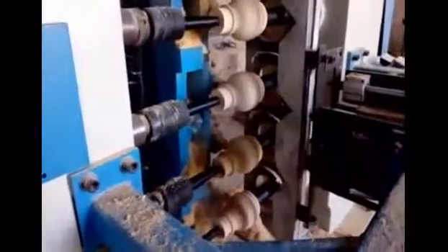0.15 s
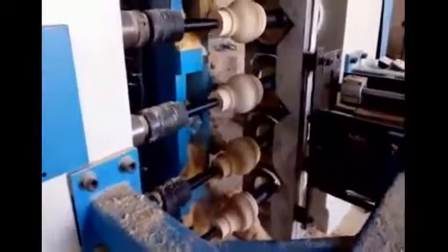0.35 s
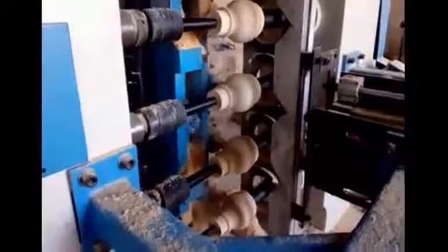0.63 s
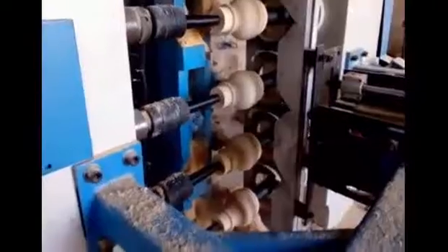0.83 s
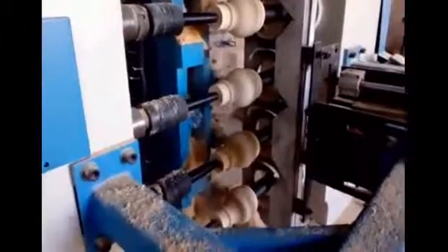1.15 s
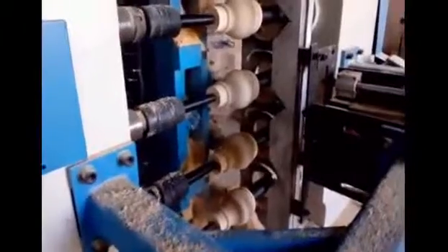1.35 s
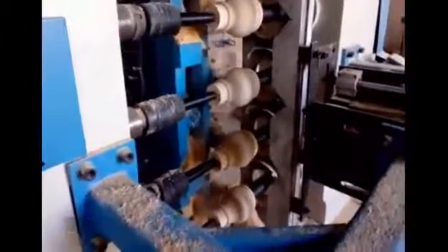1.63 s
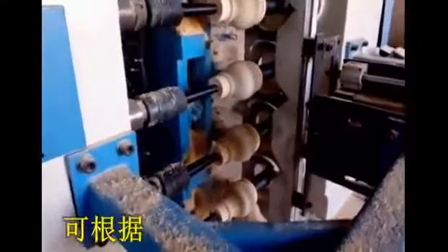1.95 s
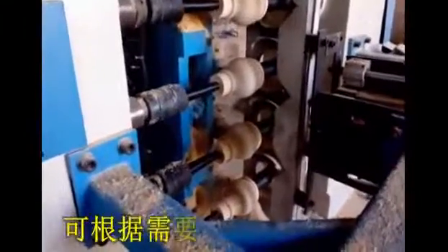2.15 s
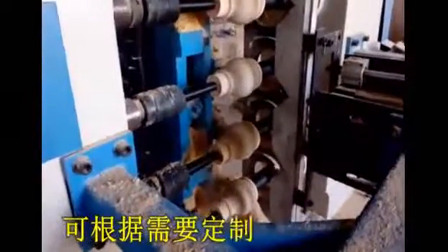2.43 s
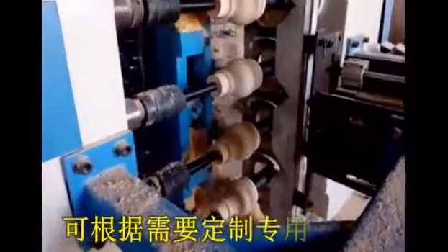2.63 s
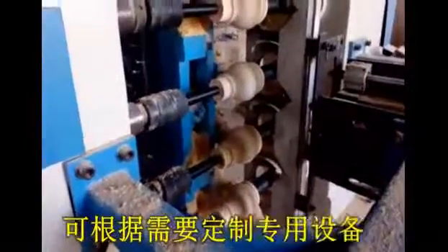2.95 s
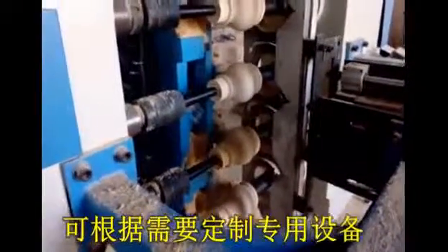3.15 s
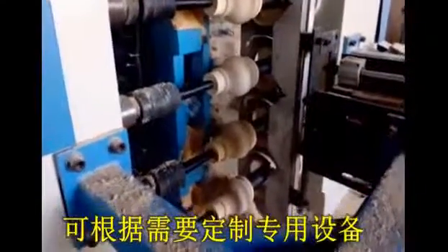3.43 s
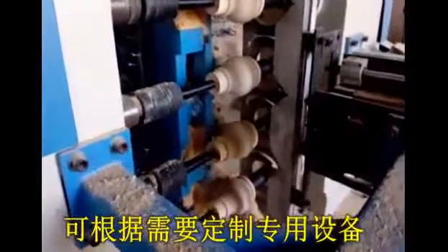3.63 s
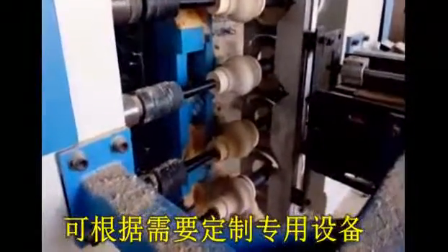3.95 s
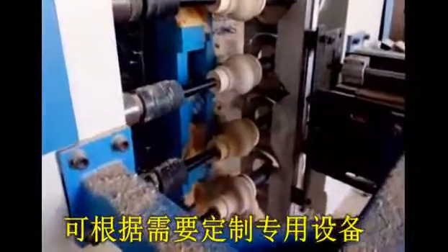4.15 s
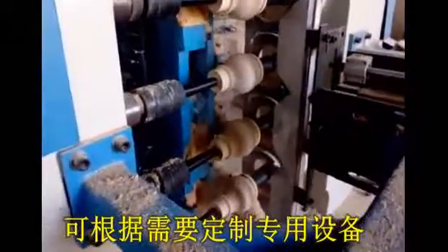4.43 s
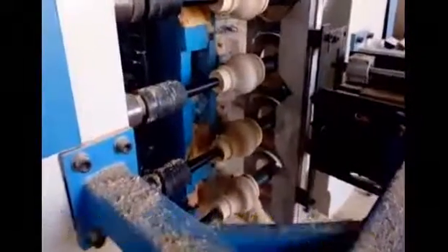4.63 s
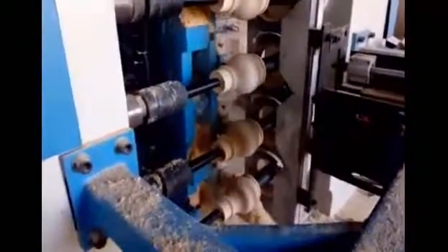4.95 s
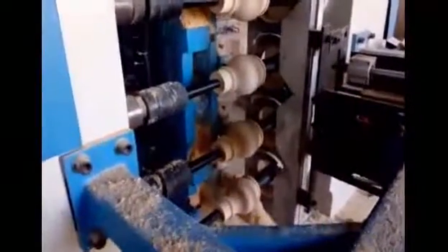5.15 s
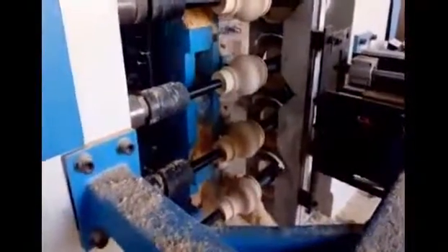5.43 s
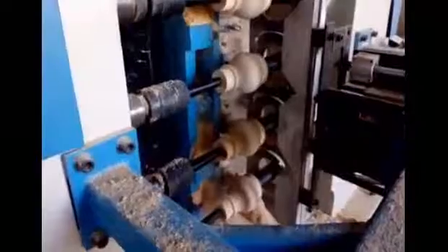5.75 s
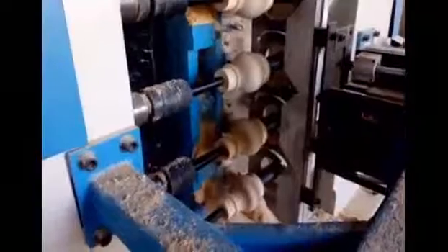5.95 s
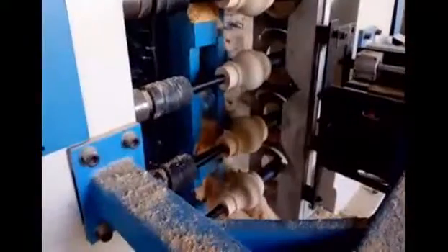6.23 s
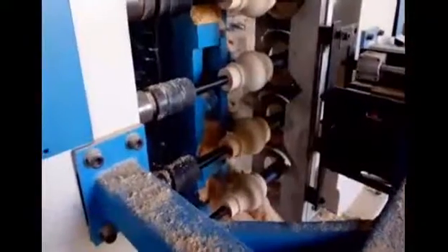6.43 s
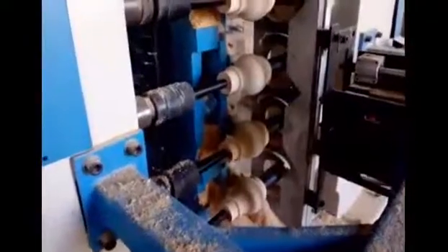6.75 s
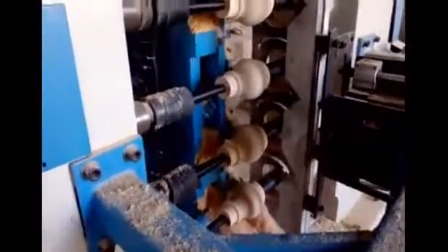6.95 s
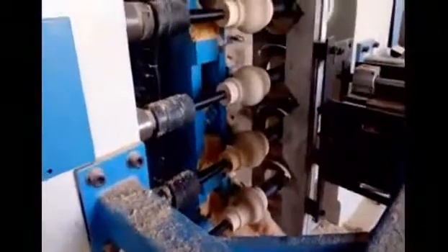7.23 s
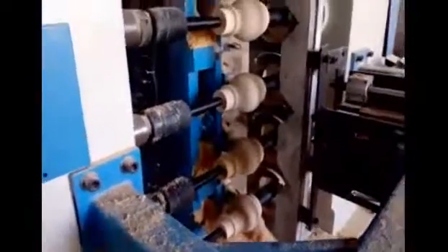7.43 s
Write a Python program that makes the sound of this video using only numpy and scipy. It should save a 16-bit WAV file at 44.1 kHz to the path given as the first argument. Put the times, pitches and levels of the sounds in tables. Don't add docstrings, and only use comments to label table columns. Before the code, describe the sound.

Close up in a workshop, a multi-spindle wood lathe runs continuously: low motor rumble, a piercing gear whine fluttering rapidly, and harsh rushing noise of blades shaving wood. Halfway through, the tool slide groans briefly and the cut changes colour. Dust hiss swells, pushing the rest down, then fades. Finally the blades lift and the freed spindles whine and rumble louder.

```python
import sys
import numpy as np
from scipy import signal
from scipy.fft import rfft, irfft, next_fast_len
from scipy.io import wavfile
from scipy.ndimage import uniform_filter1d, map_coordinates

SR = 44100
rng = np.random.default_rng(int(sys.argv[2]) if len(sys.argv) > 2 else 0)


def rack_gain(trim_db):
    fader = np.asarray(trim_db, float)
    return 10 ** (fader / 20)


def store_pcm(level_fs):
    pcm = np.round(np.clip(level_fs, -1, 1) * 32767).astype(np.int16)
    wavfile.write(sys.argv[1], SR, np.atleast_2d(pcm).T)


N = 335160


def unit(x):
    return x / np.sqrt(np.mean(x ** 2) + 1e-20)


def along(points, hz):
    f, v = np.transpose(points)
    return np.interp(np.log(hz + 1), np.log(f + 1), v)


def curves(rows):
    s, *cols = np.transpose(rows)
    return [np.interp(np.arange(N) / SR, s, c) for c in cols]


def wobble(rate):
    knots = rng.standard_normal(int(N * rate / SR) + 4)
    return map_coordinates(knots, [np.arange(N) * rate / SR])


def filtered(x, response):
    m = next_fast_len(N + 8192)
    return irfft(rfft(x, m) * response(np.fft.rfftfreq(m, 1 / SR)), m)[..., :N]


def bumps_db(modes, hz):
    return sum(db / (1 + (2 * (hz - centre) / width) ** 2) for centre, width, db in modes)


def narrow(centre_hz, width_hz):
    phase = 2 * np.pi * centre_hz * np.arange(N) / SR
    return unit(wobble(width_hz) * np.cos(phase) + wobble(width_hz) * np.sin(phase))


def field(shape, bins, frames):
    x = uniform_filter1d(rng.standard_normal(shape), max(1, round(bins)), -2)
    return unit(uniform_filter1d(x, max(1, round(frames)), -1))


# frequency in Hz, left-right likeness from 0 to 1.
LIKENESS = [(60, .7), (400, .6), (2000, .6), (7000, .7), (9000, .3)]


def rush(colour_db, streak_db):
    re, im = rng.standard_normal((2, 2, 1025, N // 1024 + 3))
    streaks = rack_gain(streak_db * field(re.shape[1:], 3, 4))
    pair = signal.istft((re + 1j * im) * streaks, window="cosine", nperseg=2048)[1][:, :N]

    def mid_side_response(hz):
        turn = np.arccos(np.clip(along(LIKENESS, hz), 0, 1)) / 2
        return rack_gain(colour_db(hz)) * [np.cos(turn), np.sin(turn)]

    mid, side = filtered(pair, mid_side_response)
    return unit(np.array([mid + side, mid - side]))


FREED_S = (7.1, 7.35)


def shudder_db():
    return np.interp(np.arange(N) / SR, FREED_S, (0, 2.5))


# time in seconds, depth of cut in dB, dust flow in dB.
CUT = [(0, 0, 0.5), (1.9, 1.5, -2), (3.2, 1.5, -0.5), (3.6, 0, 4), (3.85, 0.5, 3), (4.0, -2.5, 4),
       (4.8, -0.5, 8), (5.7, 2, 9), (6.3, 2, 4.5), (6.8, -2, 2), (7.06, -5, -4)]
# time in seconds, level in dB.
LIFT = [
    (7.06, -5),
    (7.1, -14),
    (7.13, -28),
    (7.2, -28),
]


def load_db():
    unloaded_db = -8.5
    return np.maximum(curves(CUT)[0] + curves(LIFT)[0], unloaded_db)


# frequency in Hz, density in dB per Hz.
RUMBLE = [(8.8, -43), (15, -2), (38, -22), (64, -9.5), (97, -6), (155, 1), (209, -4.5), (252, -2),
          (350, -11), (460, -40), (770, -120)]
# centre in Hz, width in Hz, dB above the rumble.
FRAME_MODES = [(69, 9.8, 3), (158, 32, 0), (245, 23, 5)]
# frequency in Hz, density in dB per Hz.
BED = [(250, -67), (350, 1), (500, -3.5), (646, -3.5), (740, -6.5), (800, -31), (1000, -55)]
# frequency in Hz, density in dB per Hz.
CASING = [(460, -31), (780, -8.5), (984, -4), (1150, -6.5), (1460, -3.5), (1600, -3), (1700, 1),
          (1860, -2.5), (2000, -19), (2600, -37), (4400, -120)]


def frame():
    rumble_db, bed_db, casing_db = -25.5, -35.5, -32
    bed_follows, casing_follows = 0.18, 0.8
    rumble = rush(lambda hz: along(RUMBLE, hz) + bumps_db(FRAME_MODES, hz), streak_db=-0.7)
    rumble = rumble + rack_gain(-17) * narrow(74, width_hz=7.6)
    lumps = rack_gain(1.2 * wobble(45))
    bed = rush(lambda hz: along(BED, hz), streak_db=-1.0)
    casing = rush(lambda hz: along(CASING, hz), streak_db=0.5)
    shaken = rack_gain(rumble_db + shudder_db()) * lumps * rumble
    bed = rack_gain(bed_db + bed_follows * load_db() + 0.77 * wobble(9.7)) * bed
    return shaken + bed + rack_gain(casing_db + casing_follows * load_db() + 0.42 * wobble(7.4)) * casing


# time in seconds, level in dB.
SLIDE = [
    (3.8, -80),
    (3.9, -44),
    (3.97, -35),
    (4.07, -32),
    (4.15, -34),
    (4.22, -50),
    (4.3, -80),
]
# time in seconds, level in dB.
FEED = [
    (0, -38),
    (.35, -39),
    (.8, -39),
    (1.0, -65),
    (1.1, -77),
]


def slide():
    groan = rack_gain(curves(SLIDE)[0]) * rack_gain(1.5) * narrow(642, width_hz=90)
    song = rack_gain(curves(FEED)[0]) * narrow(1450, width_hz=200)
    return groan + song


MESH_HZ = 2633
# order, level in dB.
TEETH = [(7, -17), (8, -17), (9, 0), (10, -22), (11, -18), (12, -20), (13, -20), (14, -19), (15, -21)]
# time in seconds, spindle turns ahead.
LAG = [
    (0, -.3),
    (1.9, -.4),
    (2.5, .3),
    (3.4, 0),
    (4.4, -.15),
    (4.9, -.45),
    (5.6, .15),
    (6.2, .12),
    (6.8, -.35),
    (7.6, -.55),
]
PARTNER_DB = [
    [-3.5],
    [-6],
]
# time in seconds, level in dB.
MESH_LOAD = [(0, -2.5), (.6, -1), (1.2, -1), (1.9, 1), (2.4, 1.5), (3.0, 0), (3.6, -0.5), (4.1, -1),
             (4.7, -2.5), (5.3, -0.5), (5.9, 0.5), (6.4, 1.5), (6.9, 1.5), (7.2, -0.5), (7.6, -0.5)]
# frequency in Hz, density in dB per Hz.
GEARBOX = [(1500, -37), (1950, -9.5), (2100, -4.5), (2350, -1), (2800, -8), (3300, -2.5), (4400, -10),
           (5000, -9.5), (5550, -10), (5850, -23.5), (7200, -22), (9000, -21.5), (11000, -30.5),
           (13000, -60)]
# centre in Hz, width in Hz, change in
# dB.
BOX_SHAPE = [(6400, 140, -3), (7220, 40, 9), (7520, 300, -10), (8500, 300, -7), (8900, 450, -11),
             (10060, 80, -8), (10210, 40, 9)]


def gears():
    whine_db, box_db, spindle_hz = -24, -26.5, 31.17
    mesh_hz = MESH_HZ + 3 * wobble(1) + 8 * wobble(30)
    mesh = 2 * np.pi * np.cumsum(mesh_hz) / (9 * SR)
    turn = 2 * np.pi * (spindle_hz * np.arange(N) / SR + curves(LAG)[0])
    tone = 0
    for order, db in TEETH:
        jitter = 1.46 * wobble(25) * (order != 9)
        tone = tone + rack_gain(db + 1.5 * wobble(20)) * np.sin(order * mesh + jitter)
    lower = rack_gain(PARTNER_DB + 1.5 * wobble(8)) * np.sin(9 * mesh - turn)
    upper = rack_gain(-14 + 2 * wobble(8)) * np.sin(9 * mesh + turn)
    skirt = np.array([narrow(2630, width_hz=90), narrow(2630, width_hz=90)])
    whine = unit(tone + lower + upper) + rack_gain(-4) * skirt
    box = rush(lambda hz: along(GEARBOX, hz) + bumps_db(BOX_SHAPE, hz), streak_db=0.7)
    return rack_gain(whine_db + shudder_db() + curves(MESH_LOAD)[0]) * whine + rack_gain(box_db) * box


# time in seconds, share of the neck cut from 0 to 1.
TRAVEL = [
    (0, 0.11),
    (3.8, 0.08),
    (4.0, 0.82),
    (5.5, 0.99),
    (7.0, 0.36),
    (7.6, .6),
]
# frequency in Hz, density in dB per Hz.
SHAVING = [(1500, -57), (1950, -8), (2100, -8), (2400, -3.5), (2800, -4.5), (3300, -5.5), (4000, 0),
           (5500, -2), (5900, -5), (6400, -8), (7300, -11), (8500, -12)]
# centre in Hz, width in Hz, change in dB.
WIDE_CUT = [(2060, 80, 1.5), (2290, 150, 3), (3230, 80, 2), (3390, 60, 3), (3540, 50, 4), (3690, 80, 6),
            (3880, 80, -4), (4070, 90, 2.5), (4280, 130, -7), (4480, 80, 3), (4600, 90, 6), (4760, 80, -6),
            (4900, 60, 3.5), (5080, 90, 4), (5450, 150, 2), (5980, 45, 5), (6090, 50, 4), (6400, 100, -3),
            (6580, 200, 3), (6950, 100, -5), (7100, 120, 3), (7300, 100, -5)]
# centre in Hz, width in Hz, change in dB.
NECK_CUT = [(2080, 28, 3.5), (2300, 70, -11), (3370, 330, 3.5), (3685, 80, 4.5), (3800, 99, 2.5),
            (4240, 49, -1), (4590, 39, 5), (4680, 28, 5), (5660, 650, 5), (5820, 86, -1), (6700, 130, -11),
            (6400, 150, 3), (7000, 170, -21), (7230, 170, -14), (7730, 780, 6)]
# frequency in Hz, density in dB per Hz.
DUST = [(3530, -13), (6000, -8.5), (7120, -6.5), (8670, -5.5), (10600, 2), (11200, 3.5), (14500, -73),
        (22000, -120)]
# centre in Hz, width in Hz, change in dB.
NOZZLE = [(9636, 50, 4), (10080, 120, -4), (10216, 35, 7), (10690, 60, 2)]


def blades():
    shave_level, hiss_level = -14.5, -22.5
    shave_db, dust_db = np.array(curves(CUT)) + curves(LIFT)
    neck = np.clip(curves(TRAVEL)[0], 0, 1)
    bulge = rush(lambda hz: along(SHAVING, hz) + 1.25 * bumps_db(WIDE_CUT, hz), streak_db=-1.0)
    slim = rush(lambda hz: along(SHAVING, hz) + bumps_db(NECK_CUT, hz), streak_db=-0.5)
    dust = rush(lambda hz: along(DUST, hz) + bumps_db(NOZZLE, hz), streak_db=1.3)
    grain = wobble(14)
    cutting = np.sqrt(1 - neck) * bulge + np.sqrt(neck) * slim
    shaving = rack_gain(shave_level + shave_db + 0.042 * grain) * cutting
    return shaving + rack_gain(hiss_level + dust_db + 0.5 * grain + 0.82 * wobble(40)) * dust


# frequency in Hz, left-right difference in dB.
PORTS = [(60, 1), (600, 0), (1100, -1), (2600, -3), (3600, -0.5), (6500, -1), (7800, 2), (8500, 2.5),
         (11000, 6)]


def scene():
    machine = frame() + slide() + gears() + blades()
    return filtered(machine, lambda hz: rack_gain(along(PORTS, hz) * [[0.5], [-0.5]]))


# frequency in Hz, depth in dB.
FLICKER_DEPTH = [(1200, 0), (1900, 4), (2400, 5), (3500, 6), (6000, 5.5), (7500, 4.5), (8500, 2.5), (11000, 2)]


def flicker(hz, shape):
    ripple = field(shape[1:], 3, 9) + 0.4 * field(shape, 3, 9)
    ripple = unit(ripple - uniform_filter1d(ripple, size=11, axis=1))
    off_whine = abs(hz - MESH_HZ) > 70
    depth_db = along(FLICKER_DEPTH, hz)[:, None] * off_whine[:, None]
    gain = rack_gain(depth_db * unit(np.tanh(ripple)))
    return gain / np.sqrt(uniform_filter1d(gain ** 2, size=25, axis=1))


# frequency in Hz, threshold in dB relative to the reference level.
GATE_THRESHOLD = [(300, -22), (600, -13), (780, -7), (850, -5), (1000, -6), (1250, -7), (1700, -6.5), (1950, -6),
                  (2300, -7), (6000, -6.5), (6400, -3), (7600, -2), (8000, -6), (11000, -9)]
# time in seconds, extra threshold in dB.
SHORT = [(4.74, 3), (4.92, 1), (5.0, 2.5), (5.14, 2), (5.26, 3.5), (5.4, 4), (5.55, 1.5), (5.65, 4),
         (5.73, 2.5), (5.81, 7), (6.11, 7)]


def gated(hz, t, z):
    power = np.abs(z) ** 2 + 1e-14
    level = 10 * np.log10(power)
    smooth = uniform_filter1d(uniform_filter1d(power, size=3, axis=1), size=4, axis=2)
    patch = 10 * np.log10(np.abs(smooth))
    busy = uniform_filter1d(level[:, hz > 7500].mean(axis=(0, 1)), size=9)
    near = uniform_filter1d(uniform_filter1d(level, size=90, axis=1), size=9, axis=2)
    reference = np.where(hz[:, None] < 2200, busy, near)
    reference = reference + 2.8 * field(z.shape[1:], 9, 4) + 0.7 * field((1, z.shape[2]), 1, 3)
    extra_db = sum(db * (abs(t - s) < 0.03) for s, db in SHORT)
    reference = reference + (hz[:, None] < 1400) * extra_db
    floor_db = np.where(hz > 6000, -71, -99)
    limit = np.maximum(reference + along(GATE_THRESHOLD, hz)[:, None], floor_db[:, None])
    return z / (1 + rack_gain(12 * np.clip(limit - patch, -9, 2.5)))


# time in seconds, turns by which left leads.
APART = [(0.0, 0.33), (0.24, -0.37), (0.45, -2.07), (0.82, 0.14), (0.88, -0.51), (0.97, -0.08),
         (1.1, -1.46), (1.27, -1.65), (1.33, -1.1), (1.45, -2.67), (1.63, -3.74), (1.89, -3.38),
         (2.04, -2.54), (2.34, -4.79), (2.56, -5.69), (2.67, -5.55), (2.72, -6.37), (2.85, -5.54),
         (3.17, -5.85), (3.23, -5.26), (3.45, -5.25), (3.46, -4.82), (3.64, -5.04), (3.79, -3.92),
         (3.86, -4.95), (3.98, -4.4), (4.08, -4.73), (4.25, -2.77), (4.35, -3.21), (4.43, -2.39),
         (4.57, -3.07), (4.69, -4.77), (4.8, -5.21), (4.87, -5.09), (4.92, -4.34), (4.98, -4.73),
         (5.16, -2.83), (5.24, -3.5), (5.42, -2.73), (5.48, -3.09), (5.54, -2.43), (5.76, -3.4),
         (5.87, -3.13), (5.96, -4.11), (6.09, -4.42), (6.15, -3.6), (6.35, -4.6), (6.45, -4.51),
         (6.6, -3.4), (6.68, -4.37), (6.73, -3.69), (6.84, -3.47), (6.87, -3.94), (6.94, -3.51),
         (7.1, -3.92), (7.23, -3.27), (7.35, -4.01), (7.59, -3.96)]
LOCKED_HZ = (2510, 2760)


def drifting(hz, t):
    band = np.arange(len(hz)) // 6
    whine = band[np.searchsorted(hz, MESH_HZ)]
    band[(hz > LOCKED_HZ[0]) & (hz < LOCKED_HZ[1])] = whine
    wander = np.cumsum(field((2, band.max() + 1, len(t)), 1, 2), axis=-1)
    quick_turns = 0.06 * field((1, len(t)), 1, 6)[0]
    apart = np.pi * (np.interp(t, *np.transpose(APART)) + quick_turns)
    phase = 0.55 * wander
    phase[:, whine] = phase[0, whine] + [apart, -apart]
    return np.exp(1j * phase)[:, band]


def low_pass(x):
    return signal.sosfilt(signal.butter(12, 12150, fs=SR, output="sos"), x)


# time in seconds, gain in dB.
GAIN = [(0, 0), (.03, 0.5), (3.4, 0), (4.0, 0), (4.6, -1.5), (5.2, -5), (5.9, -4.5), (6.15, -3),
        (6.3, -2.5), (6.9, 1), (7.15, 2.5), (7.6, 2.5)]


def record(dry):
    dry = dry * rack_gain(curves(GAIN)[0])
    hz, t, z = signal.stft(dry, SR, nperseg=2048, noverlap=1536)
    kept = hz < 11200
    heard = z[:, kept] * flicker(hz[kept], z[:, kept].shape)
    z[:, kept] = gated(hz[kept], t, heard) * drifting(hz[kept], t)
    lowpass = kept / (1 + (hz / 11080) ** 150)
    x = signal.istft(z * lowpass[:, None], SR, nperseg=2048, noverlap=1536)[1][:, :N]
    return low_pass(x * np.sqrt(np.mean(dry ** 2) / np.mean(x ** 2)))


dry = scene()
out = record(dry)
store_pcm(out)
```